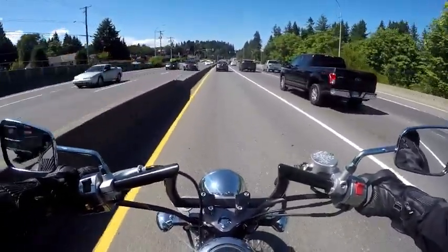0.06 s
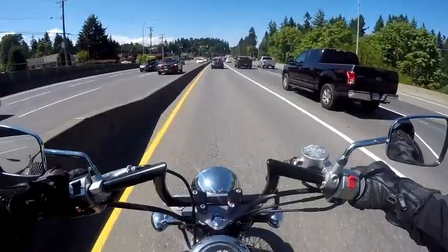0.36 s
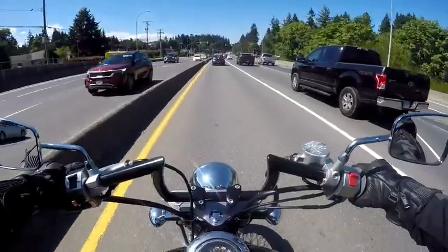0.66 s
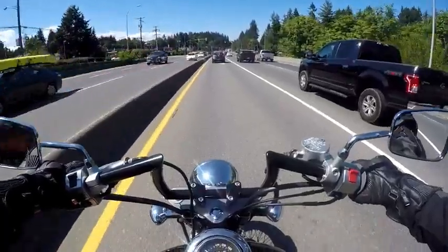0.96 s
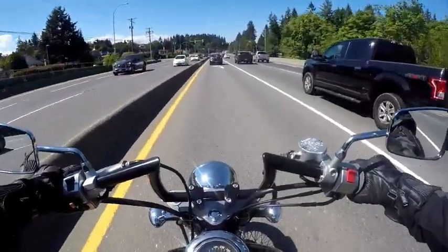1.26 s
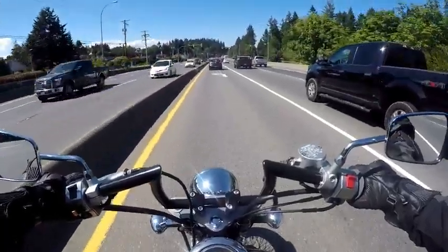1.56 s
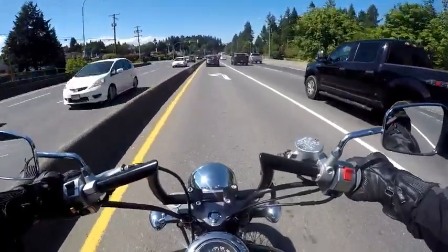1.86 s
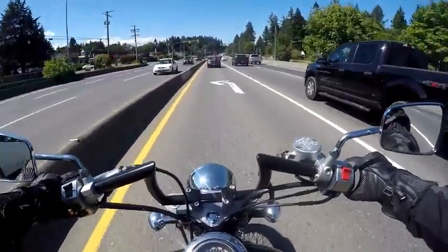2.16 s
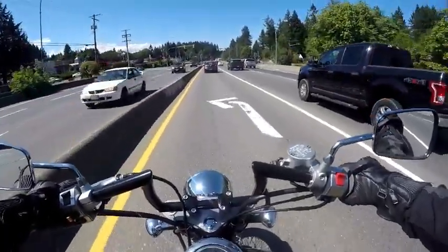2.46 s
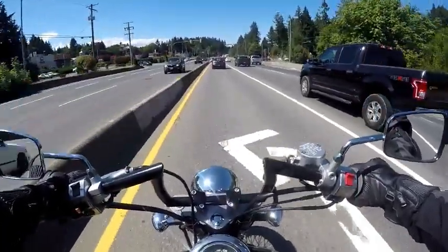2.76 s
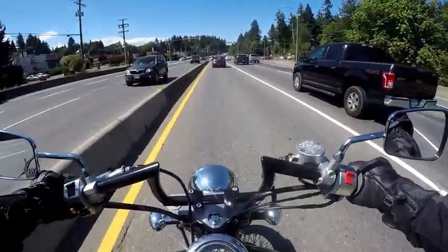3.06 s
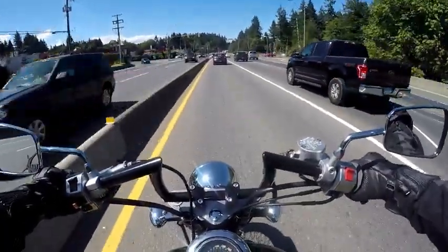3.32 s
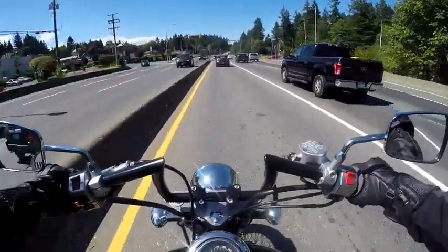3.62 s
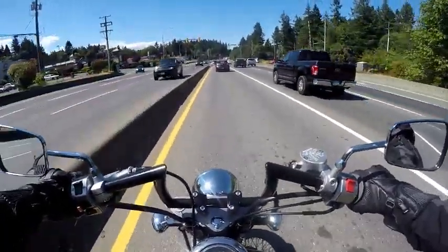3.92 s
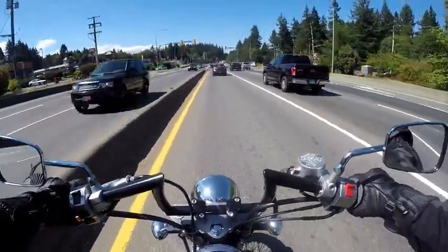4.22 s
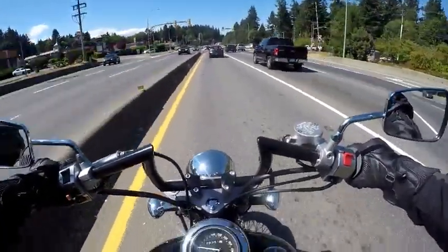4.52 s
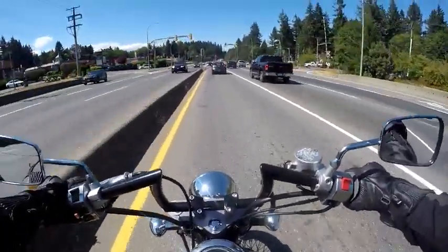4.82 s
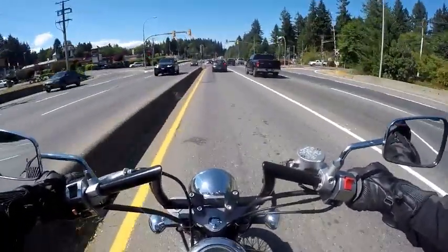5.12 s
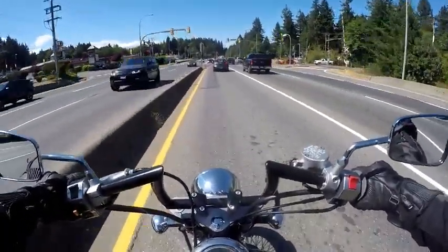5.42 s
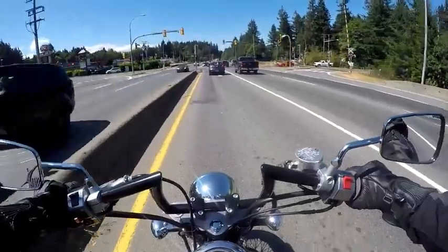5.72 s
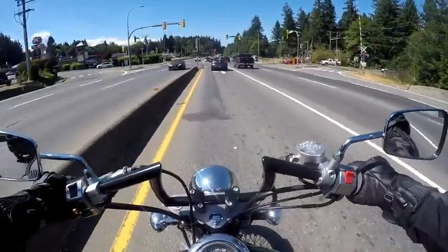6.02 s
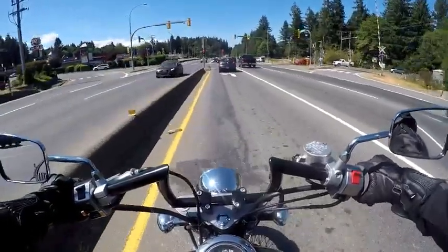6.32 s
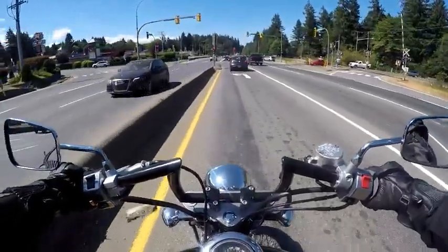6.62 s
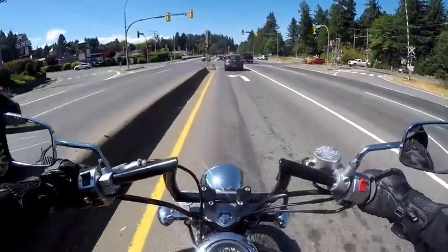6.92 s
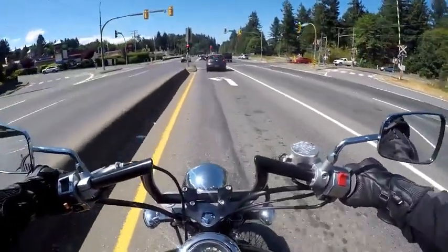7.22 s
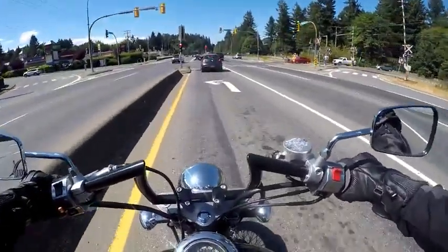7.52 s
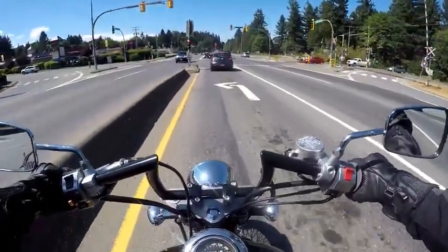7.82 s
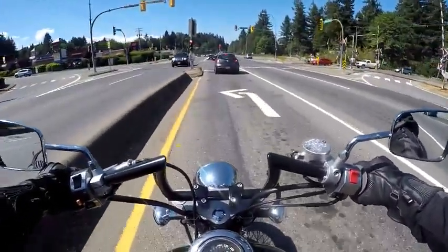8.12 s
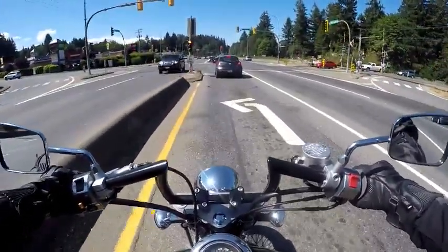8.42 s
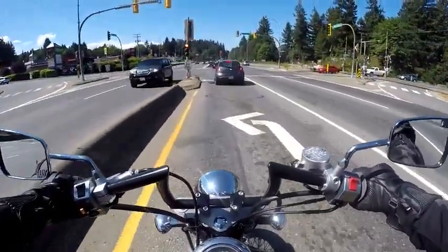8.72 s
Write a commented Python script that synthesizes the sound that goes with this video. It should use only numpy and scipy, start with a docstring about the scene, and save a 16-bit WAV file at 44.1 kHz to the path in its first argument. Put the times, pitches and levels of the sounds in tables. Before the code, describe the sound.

A twin-cylinder motorcycle slows with loud burbling and popping, blips through four downshifts and settles to idle, amid wind and passing cars.

```python
"""Open pipes burble and pop close below the microphone: a twin-cylinder motorcycle, heard from the seat,
slowing in traffic. Each firing sends a slug of gas down the pipe, which booms, barks and rasps; on the
closed throttle unburnt fuel goes off inside. Wind rumbles on the microphone, tyres hiss, oncoming cars
sweep past and loose metal rattles. Faint whistles slide down, the throttle is blipped for each of four
downshifts, and the engine settles to a slow, hard idle."""
import sys
import numpy as np
from scipy import signal
from scipy.fft import rfft, irfft, next_fast_len
from scipy.io import wavfile
from scipy.ndimage import uniform_filter1d, minimum_filter1d, map_coordinates

SR = 44100
rng = np.random.default_rng(int(sys.argv[2]) if len(sys.argv) > 2 else 0)


def to_wav(s):
    """Save 16-bit WAV."""
    ch = np.atleast_2d(s).T  # columns
    pcm = np.round(np.clip(ch, -1, 1) * 32767)  # PCM
    wavfile.write(sys.argv[1], SR, pcm.astype(np.int16))


N = 386757
T = np.arange(N) / SR

# The gears in turn. Each row: throttle opening in seconds, rise time in seconds, top engine speed in
# four-stroke cycles a second, decay of that speed per second, clutch pull in seconds.
GEARS = [(-.2, .1, 35.698, .112, 3.1), (3.089, .126, 29.864, .109, 3.306),
         (4.074, .302, 28.131, .185, 5.705), (6.078, .165, 24.277, .1, 6.254),
         (6.863, .143, 23.46, .119, 7.026)]
# The exhaust from the seat. Each row: engine speed in cycles a second, boom in dB, bark in dB,
# rasp in dB relative to the bark, clean share of the tone from 0 to 1.
EXHAUST_VOICE = [(12, -15.5, -17.5, -34.5, 0.97), (16.6, -17, -20.5, -36.5, 0.98),
                 (18.2, -17.5, -23, -35.5, 0.4), (23.7, -15, -24, -16.5, .45),
                 (23.8, -14.5, -24.5, -15.5, .2), (29.8, -14, -23.5, -13.5, 0),
                 (35.7, -14.5, -19.5, -10.5, 0.01)]
# How the firings stumble. Each row: engine speed in cycles a second, scatter of level in dB.
STUMBLE = [(12, .8), (15, 1.2), (19, 1.6), (24, 1.8), (28, 1.4), (34, 1)]
# The pipe's lowest mode, higher in hotter gas. Each row: time in seconds, pitch in Hz.
BOOM_PITCH = [(0, 126.6), (1.2, 117.3), (2.2, 110.4), (3.1, 107), (3.3, 112.4), (3.9, 100.3), (4.4, 108.3),
              (5.1, 99.2), (6.4, 103.6), (7.3, 96.6), (8.2, 108)]
# The pipe's colour. Each row: frequency in Hz, level in dB in cool gas, level in dB in hot gas.
BARK = [(100, -24, -18), (168, -12, -5.5), (208, -1, 1.5), (282, 7.5, 3.5), (357, 1.5, 2), (415, 2, 4),
        (481.5, -2, -2), (544, -15, -14), (620, -32.5, -29.5), (990, -41.5, -40), (2490, -71.5, -79.5),
        (8000, -115, -115)]  # ordinary firings
BANG = [(70, -37.5, -41.5), (172, -9.5, -4), (236, 7, 3), (294, 8.5, 3), (355, -3, -6), (416, -1, 7),
        (476, -5, -7), (600, -11, -10), (620, -30, -15.5), (760, -26, -22.5), (1050, -41, -34),
        (2500, -71.5, -67), (8000, -115, -115)]  # hard firings

# Spectra at the microphone. Each row: frequency in Hz, level in dB.
BOOM = [(20, -27), (45, -14), (65, -2), (85, 6), (104, 10.5), (122, 7), (148, -7), (185, -20), (300, -31.5),
        (600, -87.5), (4000, -120)]  # the pipe's low ring
CHUG = [(100, -20), (170, -6.5), (205, -2), (245, 3), (290, -2), (350, -1.5), (420, -7), (480, -11.5),
        (540, -33), (620, -56), (1000, -52), (2500, -77.5), (8000, -115)]  # the pipe at idle
RASP = [(300, -38), (560, 18), (645, -6.5), (760, 9), (880, 6), (1050, -9), (1500, -8), (2200, -10),
        (2850, -7.5), (3400, -20.5), (5200, -22.5), (6500, -30), (10000, -60), (14000, -64)]  # gas at the pipe's mouth
VALVES = [(1500, -16), (2800, 7), (3600, -6.5), (4700, -8.5), (5200, 2.5), (5700, -13), (6500, -16.5),
          (7900, -15.5), (10000, -30.5), (14000, -30.5)]  # ticking in the engine
WIND = [(10, -15), (28, -11), (45, -12.5), (90, -10), (250, -16.5), (1000, -45.5), (4000, -86.5)]  # right on the microphone
ROAD_HISS = [(200, -16), (680, -0.5), (1000, 1), (1500, -0.5), (2200, -5.5), (2850, -1), (3400, -16.5),
             (3800, -10.5), (4400, -19), (5200, -15), (6500, -28.5), (7800, -30), (9500, -35.5),
             (14000, -36.5)]  # the motorcycle's own tyres and air
CAR_HISS = [(300, -19.5), (850, 6.5), (1200, -2.5), (1800, 4), (2900, -5.5), (3400, -10.5), (5200, -14),
            (6600, -22), (8000, -24.5), (9500, -32), (11300, -36.5), (12800, -34), (15000, -40.5)]  # oncoming tyres, bright part
CAR_ROAR = [(300, -19.5), (800, -1), (1100, 0), (1600, 2), (2000, -5.5), (2900, -4.5), (3500, -18),
            (5200, -20.5), (8000, -38), (15000, -56)]  # oncoming tyres, dull part
CRACK = [(450, -16.5), (780, 8), (1050, -4.5), (1350, 2), (2200, -9.5), (2850, -3.5), (3400, -19.5),
         (5200, -20), (7000, -33.5), (14000, -52.5)]  # the sharp edge of a pop or blip
TEAR = [(300, -17.5), (430, -1), (520, 2), (595, 6), (680, -6), (770, -1), (880, 0.5), (1060, -13),
        (1250, -7), (1700, -17.5), (3500, -51), (9000, -76.5)]  # air tearing in a pop
CHATTER = [(1500, -16), (2800, 4), (3500, -9), (5200, -5), (6500, -6), (7900, -11), (10000, -22.5),
           (14000, -24)]  # dry contacts of loose metal
KNOCK = [(400, -23.5), (620, -14.5), (705, 6.5), (795, -8.5), (865, 0), (960, -9.5), (1080, -14.5),
         (1700, -23.5), (3500, -54.5), (9000, -82)]  # the hollow pipe in a blip
SIZZLE = [(5000, -23.5), (7200, -6.5), (8300, 0), (9300, -15), (11600, -13.5), (12600, -1.5), (13500, -1.5),
          (15000, -11.5)]  # tyres at their nearest

# Oncoming cars. Each row: nearest moment in seconds, level in dB, half-length in seconds,
# share of hiss against roar from 0 to 1.
CARS = [(0.05, -45, 0.39, 0.6), (1.88, -42, 0.3, 0.88), (2.63, -39.5, 0.23, .95), (3.328, -43, 0.27, 0.8),
        (4.32, -36, 0.28, 0.98), (5.673, -35.5, 0.3, 0.4), (6.82, -35.5, 0.18, 0.8), (8.8, -42, 0.62, 0)]
# Fuel popping in the pipe. Each row: start in seconds, relative level in dB, relative crack in dB.
POPS = [(.014, -0.5, -21.5), (.076, -19.5, -15.5), (.315, -3.5, -13.5), (.365, -3.5, -26),
        (.577, -1, -19.5), (.732, -10, -11.5), (.889, -2, -22.5), (.981, -3, -26), (1.055, -7.5, -9),
        (1.109, -2.5, -17), (1.205, -5.5, -23), (1.506, -4, -22), (1.612, -6.5, -25.5),
        (1.683, -9.5, -17.5), (1.789, -9.5, -16.5), (2.182, -0.5, -17), (2.555, -2.5, -21),
        (2.748, -1.5, -26), (3.529, -12, -24), (4.182, -11.5, -25.5), (4.29, -10, -27), (4.32, -5.5, -21.5),
        (4.995, -4.5, -24), (5.252, -5.5, -31.5), (5.385, -4, -31.5), (5.522, -9, -23.5),
        (5.616, -7.5, -27.5), (6.72, -10.5, -33), (7.118, -11, -30), (7.509, -7, -30.5), (7.55, -11.5, -34),
        (7.668, -12, -35.5)]
# Loose metal, shaken by bumps and hard firings. Each row: time in seconds, peak level in dB.
RATTLES = [(0.0149, -26), (0.4623, -30), (0.523, -39.5), (0.7357, -31), (1.3483, -38.5), (1.6517, -41),
           (2.982, -35), (3.1742, -29), (3.2166, -31.5), (3.253, -38), (4.597, -32.5), (4.84, -36),
           (4.8762, -33.5), (5.1725, -29), (5.259, -36.5), (5.3947, -35.5), (6.172, -36.5), (6.185, -30),
           (6.2185, -23.5), (6.23, -29.5), (6.262, -38.5), (6.938, -32.5), (6.9838, -29), (7.0275, -33.5),
           (7.227, -40.5), (7.303, -41.5)]
# The ring of that metal. Each row: frequency in Hz, level in dB, seconds to fall by 60 dB.
METAL_MODES = [(2570, -6, .016), (3600, -9, .014), (4750, 0, .014), (5250, 0, .018), (5650, -4, .014),
               (7100, -9, .014), (8100, -11, .012)]
# Thin whistles. Each row: loudest moment in seconds, pitch then in Hz, level in dB.
WHISTLES = [(2.852, 12940, -62), (2.91, 12400, -62), (2.924, 11400, -66), (2.969, 10300, -68),
            (3.029, 8400, -65)]
# Cycles that misfire. Each row: time in seconds, change in the gas driving the boom in dB.
MISFIRES = [(3.10, -7), (3.82, -5), (4.03, -6), (4.12, -6), (4.71, -4), (5.09, -2.5), (6.345, -5.5),
            (6.432, -8.5), (6.528, -12), (7.115, -8), (7.21, -9), (7.30, -8.5), (7.40, -11.5), (7.50, -1.5),
            (7.735, -14.5)]
# Hard firings in the throttle blips. Each row: time in seconds, relative level in dB,
# crack in dB and knock in dB, both against the bang.
BLIP_FIRINGS = [(3.137, -6, -27, -17.5), (3.176, -1.5, -25, -16), (3.213, 3, -19.5, -16.5),
                (3.248, -4, -24.5, -14), (3.281, -9, -28, -20), (4.39, -10, -24.5, -18),
                (4.42, -5.5, -22, -13.5), (4.451, -7, -24.5, -20), (6.119, -1, -34, -30.5),
                (6.17, 1.5, -22.5, -24), (6.217, 0, -22.5, -21), (6.259, -5, -31, -21.5),
                (6.302, -7, -34.5, -19.5), (6.932, -1.5, -27.5, -22.5), (6.981, -1.5, -26, -21.5),
                (7.025, -1.5, -26, -21.5), (7.068, -6, -31, -23.5)]
# Cars sizzling as they draw level. Each row: time in seconds, level in dB, half-length in seconds.
SIZZLES = [(4.3, -67, .08), (6.74, -62, .11)]

BOOM_CENTRE_HZ = 107.3  # the boom's pitch before heat shifts it
FIRING_SHIFT_S = .002  # ordinary firings sound this much later, blip thuds this much earlier


def amp(db):
    """Decibels to gain."""
    return 10 ** (np.asarray(db) / 20)


def unit(x):
    """Scaled to rms 1."""
    return x / np.sqrt(np.mean(x ** 2) + 1e-20)


def even(x):
    """Held near rms 1 over every few beats."""
    power = uniform_filter1d(uniform_filter1d(x ** 2, size=10000), size=7000)
    return x / np.sqrt(np.abs(power) + 1e-12)


def wobble(rate):
    """A smooth random curve, rate knots a second."""
    return map_coordinates(rng.standard_normal(int(N * rate / SR) + 4), [T * rate])


def through(x, spectrum, size=8192):
    """x sent through a body with the given spectrum: a minimum-phase response of energy 1."""
    hz, db = np.transpose(spectrum)
    gain = amp(np.interp(np.log(np.fft.rfftfreq(size, 1 / SR) + 1), np.log(hz), db))
    cepstrum = irfft(np.log(gain))
    cepstrum[1:size // 2] *= 2
    cepstrum[size // 2 + 1:] = 0
    response = irfft(np.exp(rfft(cepstrum)))
    return signal.fftconvolve(x, response / np.linalg.norm(response))[:len(x)]


def noise(spectrum):
    """Steady coloured noise of rms 1."""
    return unit(through(rng.standard_normal(N), spectrum))


def burst(spectrum, rise_s):
    """A short rush of coloured noise that swells and dies, rms 1."""
    t = T[:SR // 6]
    swell = (t / rise_s) ** 2 * np.exp(-2 * t / rise_s)
    return unit(through(swell * rng.standard_normal(len(t)), spectrum))


def add(track, s, sound):
    """Mixes a sound into the track at s seconds."""
    part = track[max(0, round(s * SR)):][:len(sound)]
    part += sound[:len(part)]


def engine_speed(idle=11.955, run_down_s=.696):
    """Cycles a second: a blip lifts the engine, the gear slows it, the clutch lets it drop to idle."""
    speed = np.zeros(N)
    for s, rise_s, top, decay, clutch_s in GEARS:
        geared = top * np.exp(-decay * (np.minimum(T, clutch_s) - s))
        spin = np.exp(-(np.maximum(T - clutch_s, 0) / run_down_s) ** 1.686)
        takeover = np.clip((T - s) / rise_s, 0, 1)
        speed += takeover * (idle + spin * (geared - idle) - speed)
    return speed


def cycle_times(speed, offset=0):
    """The moments at which the engine passes the same point of its cycle."""
    cycles = np.cumsum(speed) / SR - .465
    return np.interp(np.arange(int(cycles[-1]) + 1) + offset, cycles, T)


def firings(speed, scatter_db, second_db, idle_second_db, lag_cycles, jitter_s=.0003):
    """Two exhaust pulses a cycle, the second lagging the first and weakest at idle."""
    pulses = np.zeros(N)
    for offset, levels in ((0, [0, 0]), (lag_cycles, [idle_second_db, second_db])):
        at = cycle_times(speed, offset) + FIRING_SHIFT_S
        timing, strength = rng.standard_normal((len(at), 2)).T
        i = np.clip((at + jitter_s * timing) * SR, 0, N - 1).astype(int)
        pulses[i] -= amp(np.interp(speed[i], [14, 21], levels) + scatter_db[i] * strength)
    return pulses


def puffs(pulses, life_s, rise_s=.024):
    """Turbulent gas that swells after each pulse and dies away."""
    t = T[:SR // 8]
    gate = signal.fftconvolve(pulses, (1 - np.exp(-t / rise_s)) * np.exp(-t / life_s))[:N]
    return unit(gate * rng.standard_normal(N))


def heat(s, cool_hz=103, hot_hz=116):
    """How hot the gas is, 0 to 1, going by the pitch of the pipe's lowest mode."""
    return np.clip((np.interp(s, *np.transpose(BOOM_PITCH)) - cool_hz) / (hot_hz - cool_hz), 0, 1)


def warmed(table, share):
    """The spectrum a share of the way from cool gas to hot."""
    return [(hz, cool + share * (hot - cool)) for hz, cool, hot in table]


def pipe(x, trip_s, echo, spread_s):
    """Each wave runs up and down the pipe, weaker at every return; its higher tones come out later."""
    size = next_fast_len(len(x) + SR // 4)
    hz = np.fft.rfftfreq(size, 1 / SR)
    delay_s = spread_s * np.interp(hz, [209, 351, 412.6, 485], [0, .2, .5, 1.3])
    lateness = np.exp(-2j * np.pi * np.cumsum(delay_s) * hz[1])
    returns = 1 / (1 - echo * np.exp(-2j * np.pi * hz * trip_s))
    return irfft(rfft(x, size) * lateness * returns, size)[:len(x)]


def pipe_bark(fronts, clean):
    """Pressure fronts echo in the pipe: a rough burble on the overrun, a round chug at idle."""
    rough_gas = unit(fronts) + .55 * puffs(fronts, life_s=.0045)
    clean_gas = unit(fronts) + .15 * puffs(fronts, life_s=.012)
    hot = heat(T)
    cool_tone, hot_tone = (through(rough_gas, warmed(BARK, share)) for share in (0, .92))
    burble = even(pipe((1 - hot) * cool_tone + hot * hot_tone, trip_s=.0085, echo=.12, spread_s=.003))
    chug = even(pipe(through(clean_gas, CHUG), trip_s=.00863, echo=.26, spread_s=.02))
    return even(np.sqrt(1 - clean) * burble + np.sqrt(clean) * chug)


def throb(t, swell_s=.0098):
    """One short swell of the pipe's lowest mode."""
    return (t / swell_s * np.exp(-t / swell_s)) ** 3 * np.cos(2 * np.pi * BOOM_CENTRE_HZ * (t - swell_s))


def pipe_boom(speed, stumble_db, clean):
    """Slugs of gas sound the pipe's lowest mode: a short throb on the overrun, a longer ring at idle."""
    slugs = firings(speed, stumble_db, second_db=-2.5, idle_second_db=-6, lag_cycles=.2594)
    slugs *= misfire_gain(speed)
    flow = unit(slugs) + .19 * puffs(slugs, life_s=.004)
    # the pipe's own clock runs faster in hotter gas, raising the pitch
    clock = np.cumsum(np.interp(T, *np.transpose(BOOM_PITCH)) / BOOM_CENTRE_HZ)
    steps = np.arange(int(clock[-1]))
    flow = np.interp(steps, clock, flow)
    throbs = signal.fftconvolve(flow, throb(T[:SR // 12]))[:len(flow)]
    short, ringing = (even(np.interp(clock, steps, x)) for x in (throbs, through(flow, BOOM)))
    return even((1 - clean ** 2) * short + clean ** 2 * ringing)


def engine(speed):
    """Below the seat, each firing booms and barks in the pipe and rasps at its mouth; valves tick."""
    rates, *columns = np.transpose(EXHAUST_VOICE)
    boom_db, bark_db, rasp_db, clean = (np.interp(speed, rates, column) for column in columns)
    stumble_db = np.interp(speed, *np.transpose(STUMBLE))
    acceleration = uniform_filter1d(np.maximum(np.gradient(speed) * SR, 0), size=2000)
    boom_db += .15 * acceleration  # the boom swells under load
    scatter_db = .8 * stumble_db + .8 * (1 - clean)
    fronts = firings(speed, scatter_db, second_db=-3.5, idle_second_db=-8, lag_cycles=.23)
    bark = amp(bark_db) * pipe_bark(fronts, clean)
    rasp = amp(bark_db + rasp_db) * even(through(puffs(fronts, life_s=.005), RASP))
    ticks = amp(-68 + 7.9 * clean) * even(through(puffs(fronts, life_s=.0023), VALVES))
    boom = amp(boom_db) * pipe_boom(speed, stumble_db, clean)
    return boom - bark + rasp + ticks  # the bark's first swing opposes the boom's


def wind_and_road(wind_fall_db_per_s=.72, hiss_fall_db_per_s=.97):
    """Wind buffets the microphone over the hiss of tyres and air; both ease as the motorcycle slows."""
    wind = unit(noise(WIND) * amp(2 * wobble(5.2)))
    hiss = amp(1.3 * wobble(12)) * noise(ROAD_HISS)
    return amp(-17 - wind_fall_db_per_s * T) * wind + amp(-39.5 - hiss_fall_db_per_s * T) * hiss


def oncoming_cars():
    """In the other lane, each car's tyre noise swells and fades with distance, fluttering a little."""
    power = np.array([amp(db) ** 2 / (1 + ((T - s) / half_s) ** 2) ** 2 for s, db, half_s, _ in CARS])
    bright = np.array([share for *_, share in CARS])
    return sum(np.sqrt(share @ power) * amp(.78 * wobble(26)) * noise(spectrum)
               for share, spectrum in ((bright, CAR_HISS), (1 - bright, CAR_ROAR)))


def bang(s, t, length_s=.035):
    """Both cylinders fire hard, one just after the other, and ring the pipe until they empty; rms 1."""
    push = .058 * (1 - np.exp(-t / .0022)) * np.exp(-t / .015) * rng.standard_normal(len(t))
    push[0] += 1  # the first cylinder's steep front
    add(push, .0094 + .002 * rng.uniform(-.99, 1), [.85])  # the second's
    body = pipe(through(push, warmed(BANG, heat(s))), trip_s=.008, echo=.2, spread_s=.003)
    return unit(body * (1 - np.exp(-(t / .002) ** 2)) * np.exp(-(t / length_s) ** 4))


def fuel_pops(speed, sputter_share=.05, rise_s=.006):
    """Unburnt fuel goes off in the pipe with a bang, a crack and a tearing of the air."""
    track, t, at = np.zeros(N), T[:SR // 6], cycle_times(speed)
    overrun = np.interp(at, T, speed) > 20
    # weaker pops on random cycles, in rows like those of POPS
    sputter = [(s, -18, -29.5) for s in at[overrun & (rng.random(len(at)) < sputter_share)]]
    for s, db, crack_db in list(POPS) + sputter:
        air = amp(crack_db) * burst(CRACK, rise_s) + amp(-16.5) * burst(TEAR, 1.7 * rise_s)
        add(track, s, amp(db - 19) * bang(s, t) + amp(db - 22) * air)
    return track


def rattles():
    """Loose metal near the microphone chatters and rings on in its modes, differently each time."""
    track, t = np.zeros(N), T[:SR // 14]
    for s, db in RATTLES:
        chance = rng.standard_normal((len(METAL_MODES), 2))
        modes = np.zeros(len(t))
        for (hz, mode_db, t60), (strength, detune) in zip(METAL_MODES, chance):
            decay = amp(mode_db + 3.3 * strength - 60 * t / t60)
            modes += decay * np.sin(2 * np.pi * hz * (1 + .022 * detune) * t)
        chatter = burst(CHATTER, rise_s=.0055)[:len(t)]
        tick = unit(signal.fftconvolve(chatter, modes)[:len(t)]) + .79 * unit(chatter)
        add(track, s - .003, amp(db) * tick / np.abs(tick).max())
    return track


def whistles(fall_octaves_per_s=.7, half_s=.05):
    """Faint, breathy whistles slide down side by side."""
    track, t = np.zeros(N), T[:SR // 4] - .125
    for s, hz, db in WHISTLES:
        waver = unit(uniform_filter1d(rng.standard_normal(len(t)), size=30))
        pitch = hz * 2 ** (-fall_octaves_per_s * t) * (1 + .019 * waver)
        swell = amp(db) * np.exp(-(t / half_s) ** 2)
        add(track, s + t[0], swell * np.sin(2 * np.pi * np.cumsum(pitch) / SR))
    return track


def misfire_gain(speed):
    """Gain of each cycle's gas: low where it fails to burn."""
    starts, at = cycle_times(speed, offset=-.25), cycle_times(speed)
    cycle_db = np.zeros(len(starts) + 1)
    for s, db in MISFIRES:
        cycle_db[np.argmin(np.abs(at - s)) + 1] = db
    return amp(cycle_db[np.searchsorted(starts, T)])


def throttle_blips(rise_s=.009, boom_db=-.5):
    """Each firing on an open throttle is one separate thud: bang, boom, hollow knock and crack."""
    track, t = np.zeros(N), T[:SR // 6]
    for s, db, crack_db, knock_db in BLIP_FIRINGS:
        air = amp(crack_db) * burst(CRACK, rise_s) + amp(knock_db) * burst(KNOCK, rise_s)
        thud = bang(s, t) - amp(boom_db) * unit(throb(t)) + air
        add(track, s - FIRING_SHIFT_S, amp(db - 16.5) * thud)
    return track


def giving_way(duck_db=-5.5):
    """Gain of the ordinary firings, which yield to those of a blip."""
    near = sum(np.exp(-((T - s - .016) / .026) ** 4) for s, *_ in BLIP_FIRINGS)
    return amp(duck_db * np.minimum(near, 1))


def tyre_sizzle():
    """A brief, very high hiss from the tyres passing nearest the microphone."""
    swell = sum(amp(db) * np.exp(-((T - s) / half_s) ** 2 / 2) for s, db, half_s in SIZZLES)
    return swell * amp(1.5 * wobble(30)) * noise(SIZZLE)


def scene():
    """The motorcycle and the road around it, on one microphone at the rider's seat."""
    speed = engine_speed()
    motorcycle = engine(speed) * giving_way() + throttle_blips() + fuel_pops(speed) + rattles()
    return (motorcycle + wind_and_road() + oncoming_cars() + tyre_sizzle() + whistles())[None]


def record(dry, ceiling=.93, low_hz=10, top_hz=15400):
    """After the microphone, a fast limiter holds down the biggest peaks and the band is limited."""
    needed = ceiling / np.maximum(np.abs(dry), ceiling)
    held = minimum_filter1d(needed, size=400)
    gain = uniform_filter1d(uniform_filter1d(held, size=200), size=200)
    size = next_fast_len(N + SR // 2)
    hz = np.fft.rfftfreq(size, 1 / SR)
    return irfft(rfft(dry * gain, size) * (hz > low_hz) * (hz < top_hz), size)[..., :N]


dry = scene()
out = record(dry)
to_wav(out)
```